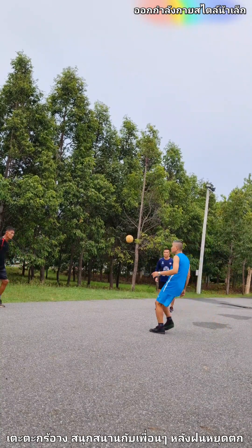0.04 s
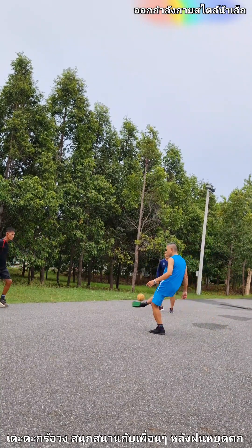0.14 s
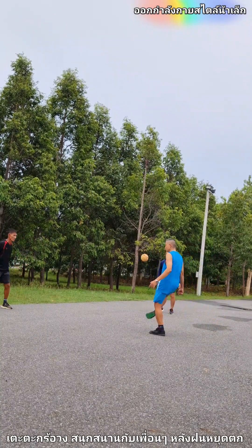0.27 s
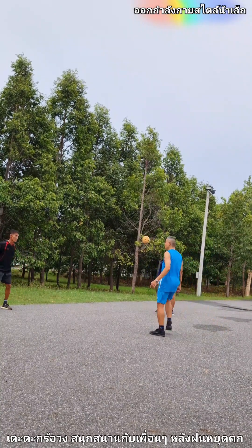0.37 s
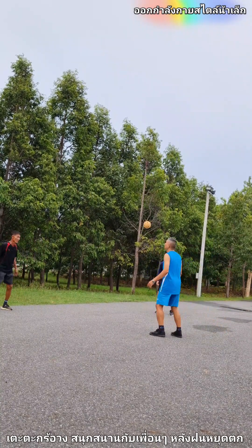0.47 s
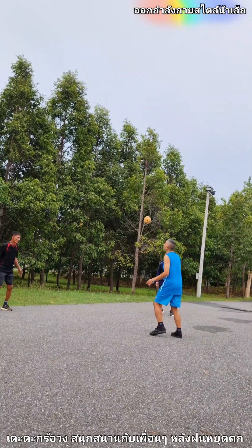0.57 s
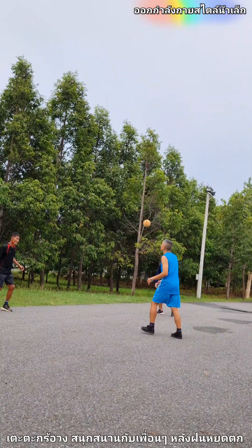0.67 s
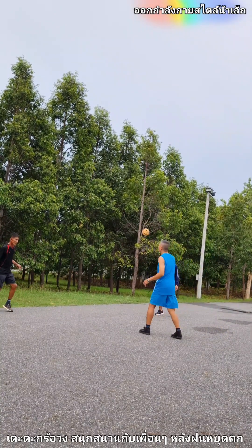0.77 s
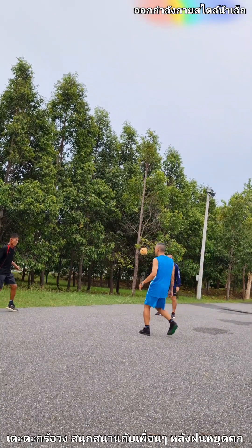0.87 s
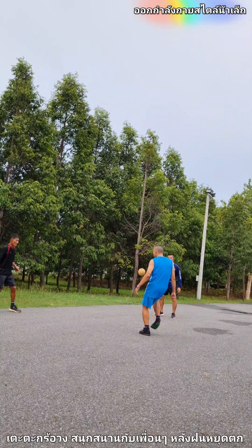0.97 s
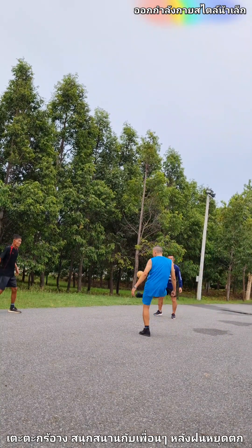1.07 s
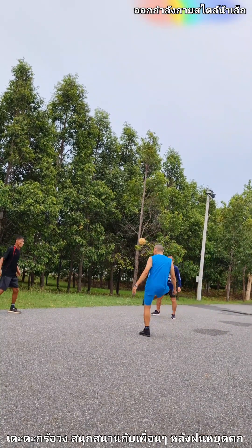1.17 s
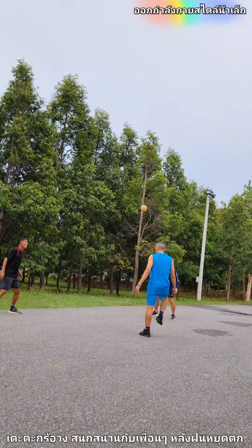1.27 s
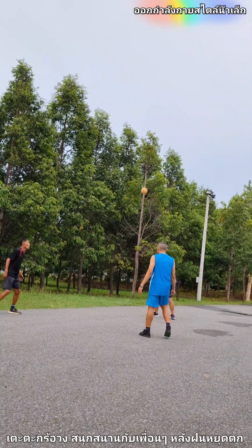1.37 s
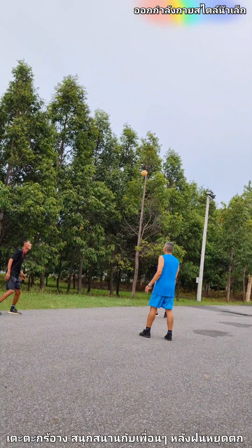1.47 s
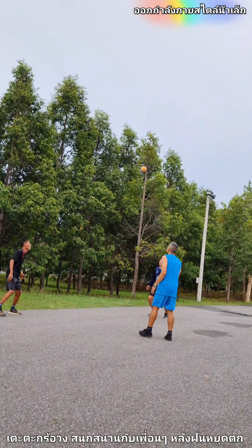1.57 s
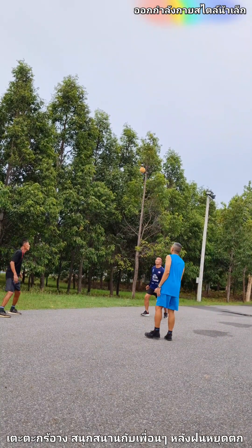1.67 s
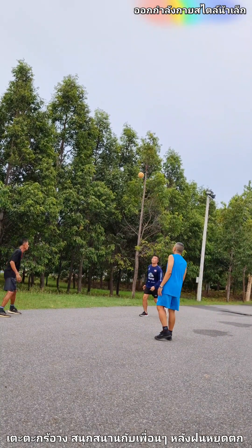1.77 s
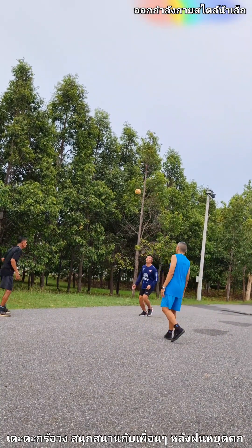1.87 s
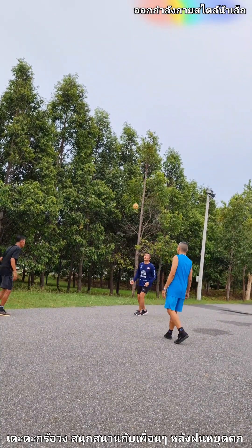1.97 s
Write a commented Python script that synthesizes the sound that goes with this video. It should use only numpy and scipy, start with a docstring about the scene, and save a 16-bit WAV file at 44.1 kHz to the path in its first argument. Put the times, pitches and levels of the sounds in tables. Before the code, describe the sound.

Two hollow kicks of a woven ball snap out about a second apart, the first louder, each with a short echo from trees. Soft footsteps scrape the pavement, with a faint, steady high insect buzz in the open air.

```python
"""Takraw kicks on an open court.

A woven ball is kicked twice on pavement beside tall trees. Each kick is a hollow knock and a
double crackle of strips as the shell dents and springs back, scattered by the trees.
Shoes scuff around the kicks; cicadas buzz steadily over a distant low rumble."""
import sys
import numpy as np
from scipy import signal
from scipy.fft import rfft, irfft
from scipy.io import wavfile

SR = 44100
rng = np.random.default_rng(int(sys.argv[2]) if len(sys.argv) > 2 else 0)


def waveform_to_disk(signal):
    """Save audio, clipped to [-1, 1], as 16-bit WAV at the path in sys.argv[1]."""
    frames = np.transpose(np.atleast_2d(signal))
    scaled = np.clip(frames, -1, 1) * 32767
    samples = np.round(scaled).astype(np.int16)
    wavfile.write(sys.argv[1], SR, samples)


N = 88200
TIME_S = np.arange(N) / SR
FREQ_HZ = np.maximum(np.fft.rfftfreq(N, 1 / SR), 1)

# Kicks: start_s, knock_db, dent_db, crackle_rise_s, tilt_db_per_octave, spring_lag_s, spring_db, trees_db
BALL_KICKS = [(0.2026, -14.5, -24.5, 0.00075, -1.5, 0.0074, -27.5, -44),
              (1.0742, -24.5, -31.5, 0.0007, 0.7, 0.006, -31, -44)]
# Shell modes: pitch_hz, t60_s, first_kick_db, second_kick_db
SHELL_MODES = [(109.4, 0.12, -7, -0.5), (178, 0.054, -6.5, -5), (260, 0.043, -1.5, 3),
               (443, 0.056, -5, -31), (522, 0.019, 4.5, 2.5), (627, 0.044, -6, -30), (673, 0.057, -23, -22),
               (931, 0.082, -28, -11), (995, 0.074, -15.5, -21.5)]
# Snapping strips: freq_hz, density_db
SNAP_SPECTRUM = [(300, -2), (1000, -16), (1500, -6.5), (2300, -9.5), (3250, -0.5), (4000, -6), (5300, 1.5),
                 (6500, 0), (8300, 3), (10500, -7.5), (12800, -4), (16000, 0)]
# Strip resonances: pitch_hz, t60_s, gain_db
STRIP_MODES = [(2130, 0.022, 2), (3313, 0.032, -8.5), (4240, 0.045, -1), (5160, 0.054, -14),
               (6480, 0.013, 0.5), (7620, 0.032, -6.5)]
# Direct crackle, balance: freq_hz, left_minus_right_db
SNAP_BALANCE = [(500, 0), (1500, 1), (2300, -3), (4000, -1), (8000, -6), (14000, -5.5)]
# Direct crackle, left-right likeness: freq_hz, correlation
SNAP_CORRELATION = [(500, .95), (1200, .5), (2100, -.1), (4000, .4), (8000, .3), (13000, .6)]
# Tree scatter: freq_hz, density_db
TREE_SPECTRUM = [(150, 2.5), (400, -4), (560, 8.5), (760, 3), (1000, 0.5), (1500, -5.5), (3300, 0.5),
                 (5000, 3), (8000, 1), (10000, -5), (13000, -4), (16000, -12)]
# Shoe scuffs: start_s, level_db, rise_s, t60_s, lowpass_hz
SCUFFS = [(0.05, -60.5, 0.0043, 0.036, 1170), (0.264, -42.5, 0.0011, 0.046, 1690),
          (0.438, -57.5, 0.0036, 0.44, 4320), (0.475, -66.5, 0.0034, 0.34, 2970),
          (0.626, -60.5, 0.012, 0.15, 1870), (0.750, -62, 0.023, 0.12, 1500), (1.4, -58, 0.0039, 0.3, 5100),
          (1.417, -53.5, 0.0093, 0.22, 3530), (1.53, -63.5, 0.0072, 0.26, 1200),
          (1.678, -65.5, 0.0035, 0.29, 1620), (1.976, -46, 0.011, 0.13, 1560)]
# Sole on grit: freq_hz, density_db
SCUFF_SPECTRUM = [(200, -10), (450, 0), (900, -1), (1600, -3.5), (2300, -8), (3300, -5.5), (6000, -3),
                  (10000, -8), (16000, -22)]
# Heel thuds: start_s, level_db
HEEL_THUDS = [(0.439, -42), (1.404, -39)]
# Cicada chorus: centre_hz, half_width_hz, level_db
CICADA_BANDS = [(4400, 430, -78.5), (4875, 420, -72.5), (6393, 340, -74.5), (6480, 270, -76.5),
                (7595, 760, -65.5), (7880, 180, -70)]
# Distant rumble: freq_hz, density_db
RUMBLE_SPECTRUM = [(20, -27), (35, -10), (55, -0.5), (100, -1), (150, -8), (220, -13), (320, -21.5),
                   (500, -28.5), (800, -47.5), (1500, -64.5)]
# Air hiss: freq_hz, density_db
AIR_SPECTRUM = [(300, 4), (800, 7), (1400, 1.5), (2200, -1), (3500, -2), (6000, -3), (9000, -6.5),
                (10200, -3), (11200, -2), (15500, -1)]
# Diffuse sound, balance: freq_hz, left_minus_right_db
DIFFUSE_BALANCE = [(60, 1.5), (300, .5), (1000, 2.5), (1900, 6), (3300, -1.5), (9000, -1.5), (15000, -4)]
# Diffuse sound, left-right likeness: freq_hz, correlation
DIFFUSE_CORRELATION = [(60, 1), (270, 0.98), (600, 0.82), (1200, 0.65), (2000, -0.033), (3300, -0.082),
                       (5000, 0.042), (6500, 0.68), (8000, 1), (15000, 0.88)]


def kick(index, start_s, knock_db, dent_db, rise_s, tilt_db_per_octave, spring_lag_s, spring_db, trees_db):
    """The shell dents, trembles and springs back; pavement and trees reflect the sound."""
    knock = from_db(knock_db) * shell_knock(index, start_s, spring_lag_s)
    dent = burst(start_s, rise_s, t60_s=0.011, hold_s=0.002)
    tremble = from_db(-19) * burst(start_s, rise_s, t60_s=0.28)
    spring = burst(start_s + spring_lag_s, rise_s, t60_s=0.018, hold_s=0.0014)
    flex = from_db(dent_db) * (dent + tremble) + from_db(spring_db) * spring
    crackle = strip_crackle(flex, tilt_db_per_octave)
    pavement = from_db(-5) * np.array([delayed(side, lag_s=0.00093) for side in crackle])
    trees = from_db(trees_db) * tree_scatter(start_s)
    return crackle + pavement + trees - from_right([knock, knock])


def shell_knock(kick_index, start_s, spring_lag_s):
    """Each mode is pushed for about one cycle; the spring-back repeats the knock faintly."""
    knock = sum(from_db(levels_db[kick_index]) * ring(push(start_s, 1 / hz), hz, t60_s)
                for hz, t60_s, *levels_db in SHELL_MODES)
    return knock + from_db(-22.5) * delayed(knock, spring_lag_s)


def strip_crackle(flex, tilt_db_per_octave):
    """Strips snap and ring as the weave flexes."""
    colour_db = curve(SNAP_SPECTRUM) + tilt_db_per_octave * np.log2(FREQ_HZ)
    snaps = flex * noise(colour_db, curve(SNAP_BALANCE), SNAP_CORRELATION, rough_db=0.5)
    return snaps + sum(from_db(db) * resonate(snaps, hz, t60_s) for hz, t60_s, db in STRIP_MODES)


def tree_scatter(start_s):
    """Trees scatter a kick into a diffuse tail."""
    return burst(start_s, rise_s=0.01, t60_s=0.56) * noise(curve(TREE_SPECTRUM), curve(DIFFUSE_BALANCE))


def footwork():
    """Soles grind over grit; heels land with a dull thud."""
    scuffs = 0
    for start_s, level_db, rise_s, t60_s, lowpass_hz in SCUFFS:
        colour_db = curve(SCUFF_SPECTRUM) - 10 * np.log10(1 + (FREQ_HZ / lowpass_hz) ** 4)
        grit = noise(colour_db, balance_db=2.5, rough_db=2.5)
        scuffs += from_db(level_db) * burst(start_s, rise_s, t60_s) * grit
    heel_force = sum(from_db(db) * push(start_s, length_s=0.0021) for start_s, db in HEEL_THUDS)
    return scuffs + ring(heel_force, pitch_hz=270, t60_s=0.039)


def cicadas():
    """Many far insects blur into a few fluttering resonances."""
    chorus = 0
    for centre_hz, half_width_hz, level_db in CICADA_BANDS:
        resonance_db = -40 * np.log10(1 + ((FREQ_HZ - centre_hz) / half_width_hz) ** 2)
        flutter_db = 2.05 * drift(corner_hz=59.4)
        swell_db = 0.5 * drift(corner_hz=6)
        chorus += from_db(level_db + flutter_db + swell_db) * noise(resonance_db, balance_db=-2.5)
    return chorus


def open_air():
    """Uneven distant rumble and a faint hiss."""
    balance_db = curve(DIFFUSE_BALANCE)
    rumble = from_db(-50 + 0.4 * drift(corner_hz=24)) * noise(curve(RUMBLE_SPECTRUM), balance_db)
    hiss = from_db(-70) * noise(curve(AIR_SPECTRUM), balance_db)
    return from_right(rumble) + hiss


def from_db(db):
    """Decibels to gain."""
    return 10 ** (np.asarray(db) / 20)


def unit_rms(x):
    """Scale to rms 1."""
    return x / np.sqrt(np.mean(x ** 2) + 1e-20)


def curve(points):
    """Table interpolated over log frequency."""
    hz, value = np.transpose(points)
    return np.interp(np.log(FREQ_HZ), np.log(hz), value)


def pan(balance_db):
    """Constant-power left and right gains."""
    gains = from_db(np.array([[0.5], [-0.5]]) * balance_db)
    return gains / np.sqrt(np.mean(gains ** 2, axis=0))


def drift(corner_hz):
    """Low-passed random motion, rms 1."""
    return unit_rms(irfft(rfft(rng.standard_normal(N)) / (1 + (FREQ_HZ / corner_hz) ** 2), N))


def noise(colour_db, balance_db, correlation_table=DIFFUSE_CORRELATION, rough_db=0):
    """Coloured stereo noise, rms 1; roughness makes it grainy."""
    mid, side = rfft(rng.standard_normal((2, N)) * from_db(rough_db * drift(corner_hz=1700)))
    correlation = np.clip(curve(correlation_table), -0.999, 0.999)
    stereo = np.sqrt(1 + correlation) * mid + np.sqrt(1 - correlation) * side * [[1], [-1]]
    return unit_rms(irfft(stereo * from_db(colour_db) * pan(balance_db), N))


def burst(start_s, rise_s, t60_s, hold_s=0):
    """Envelope: rise, hold, exponential decay."""
    age_s = TIME_S - start_s
    decay_db = -60 * np.clip((age_s - rise_s - hold_s) / t60_s, 0, 4)
    return np.clip(age_s / rise_s, 0, 1) * from_db(decay_db)


def push(start_s, length_s):
    """Smooth contact force, unit sum."""
    progress = np.maximum(TIME_S - start_s, 0) / length_s
    force = progress * np.exp(-2 * np.pi * np.minimum(progress, 10))
    return force / force.sum()


def ring(force, pitch_hz, t60_s):
    """Velocity of one damped mode."""
    radius = from_db(-60 / (t60_s * SR))
    angle_rad = 2 * np.pi * pitch_hz / SR
    return signal.lfilter([1, -1], [1, -2 * radius * np.cos(angle_rad), radius ** 2], force + 1e-18)


def resonate(x, pitch_hz, t60_s):
    """Resonance with unit gain at its centre."""
    return 2 * np.log(1000) / (t60_s * SR) * ring(x, pitch_hz, t60_s)


def delayed(x, lag_s):
    """Fractional delay of one channel."""
    return np.interp(TIME_S - lag_s, TIME_S, x, left=0)


def from_right(stereo):
    """Sound from the right reaches the left channel later."""
    return np.array([delayed(stereo[0], lag_s=0.00008), stereo[1]])


def scene():
    """Kicks and footwork over insects and open air."""
    kicks = sum(kick(index, *row) for index, row in enumerate(BALL_KICKS))
    return kicks + footwork() + cicadas() + open_air()


def record(dry):
    """Steep low-pass."""
    cutoff_hz = 15750
    return signal.sosfilt(signal.ellip(10, 0.1, 80, cutoff_hz, fs=SR, output="sos"), dry)


dry = scene()
out = record(dry)
waveform_to_disk(out)
```